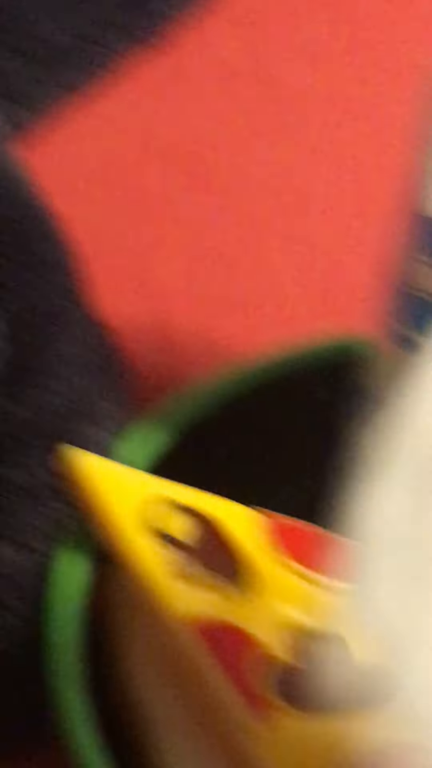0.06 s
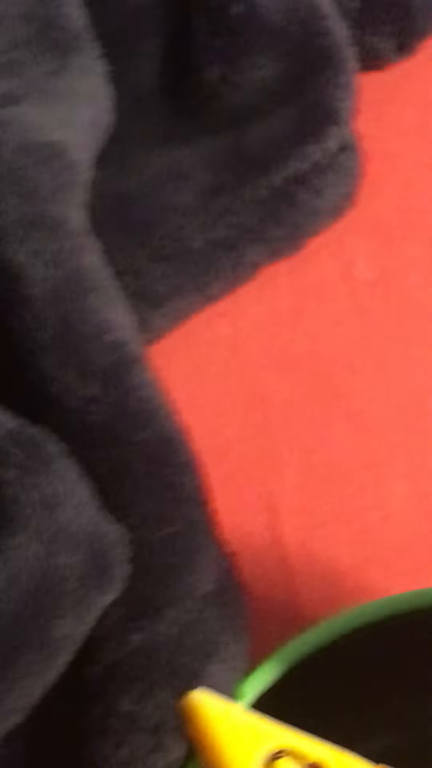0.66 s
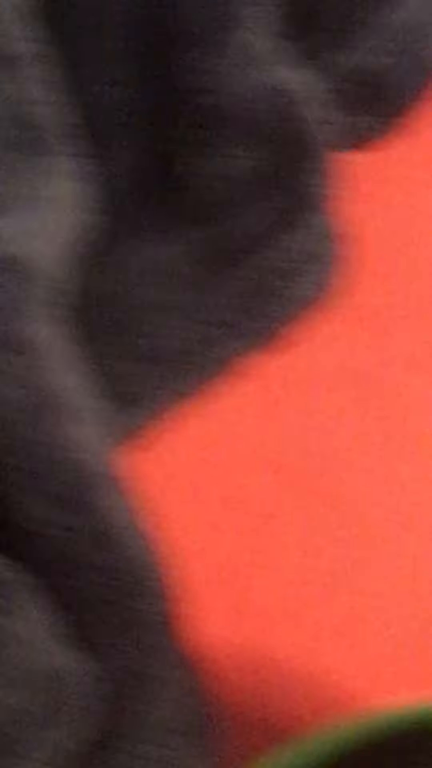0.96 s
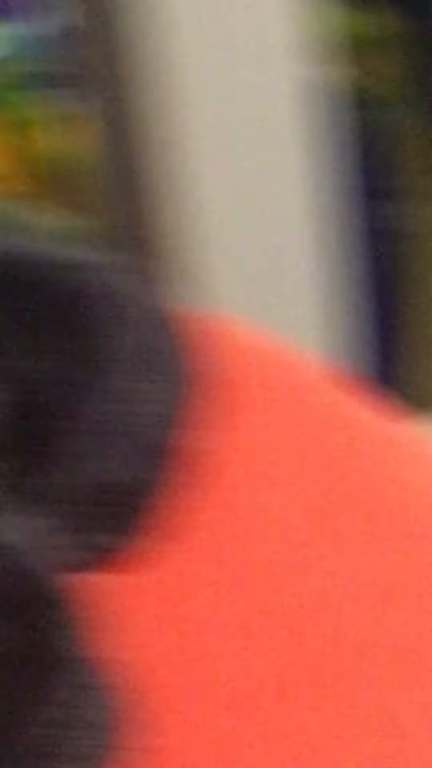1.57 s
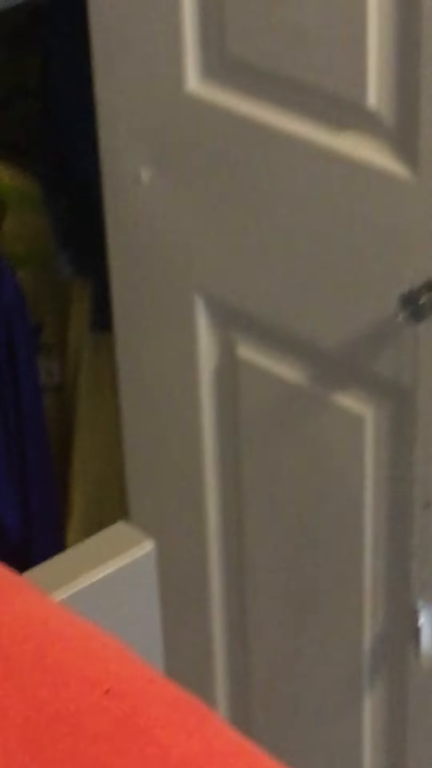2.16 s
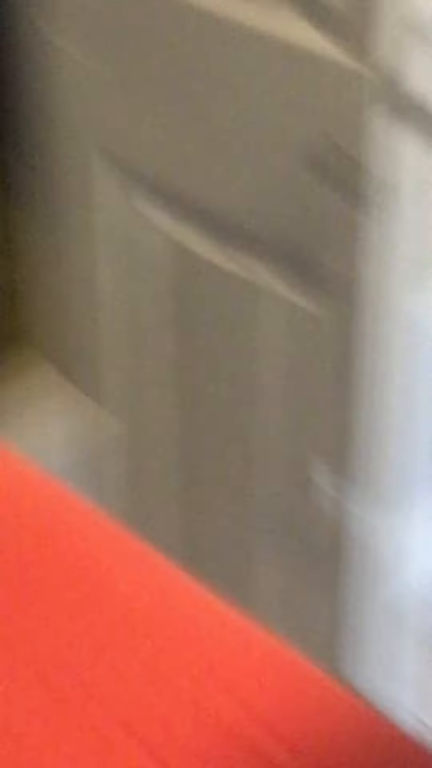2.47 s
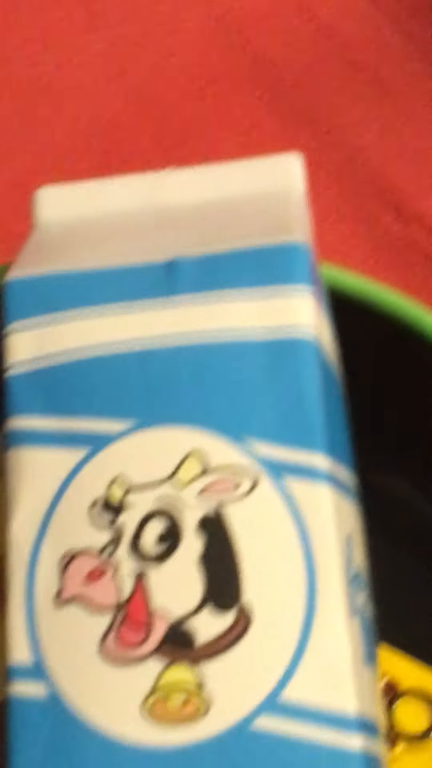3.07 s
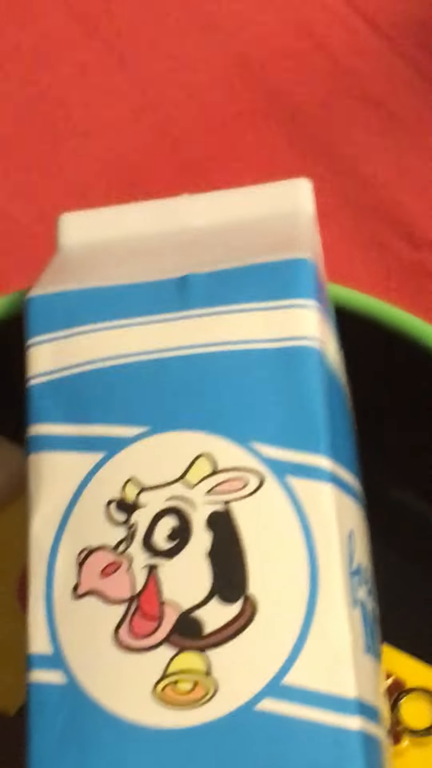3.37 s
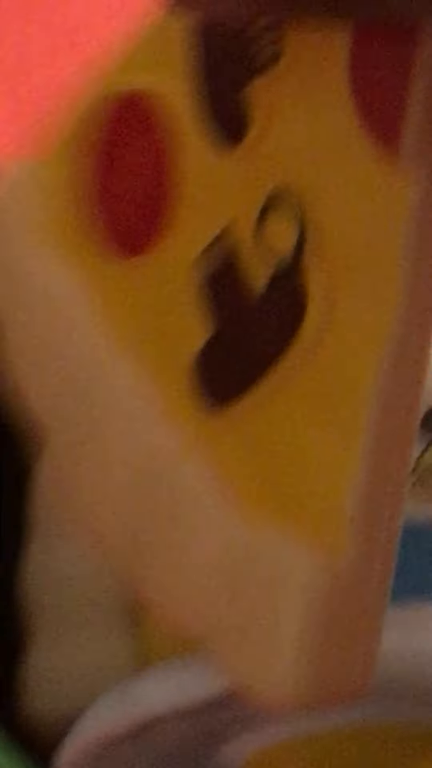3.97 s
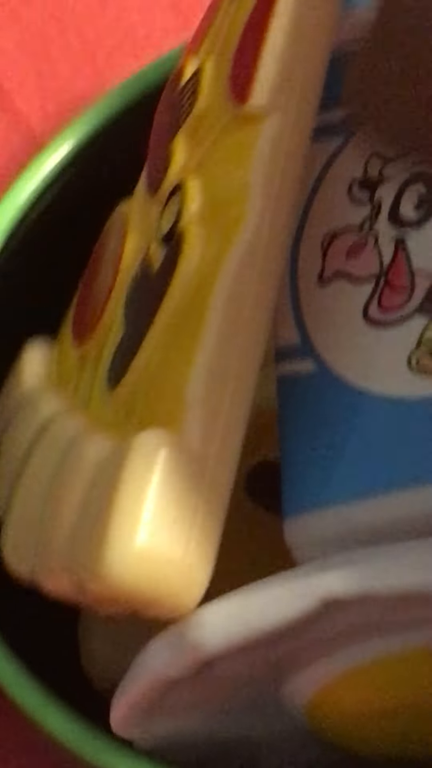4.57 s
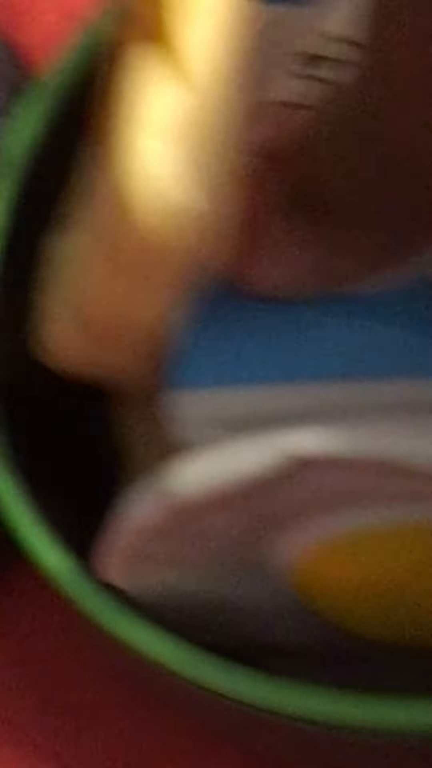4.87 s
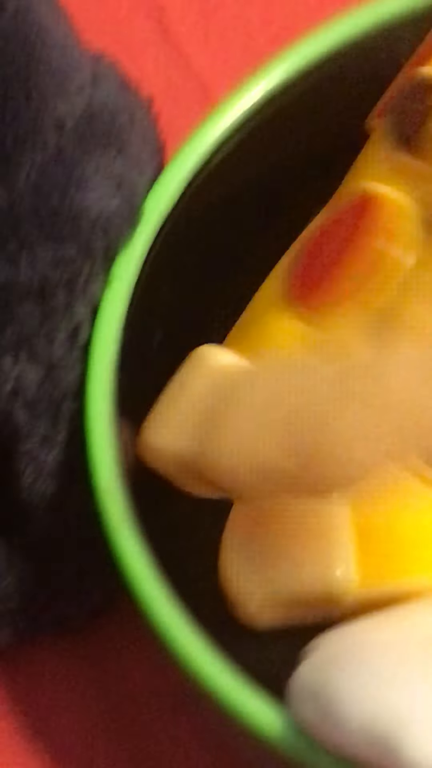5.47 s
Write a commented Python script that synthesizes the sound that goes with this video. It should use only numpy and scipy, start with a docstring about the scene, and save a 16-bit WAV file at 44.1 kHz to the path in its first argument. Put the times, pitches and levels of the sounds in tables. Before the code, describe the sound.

Hollow plastic toy foods knock, rattle and scrape in a plastic bowl, in two close bursts with a pause between.

```python
"""A small bedroom, close up: hollow plastic toy foods are shuffled in a plastic bowl, in two spells.
Each knock rings the pieces and the bowl under a chattering click; some press the bowl into the bedding
with a dull bump. Sliding edges stick and slip, rasping and ringing the same plastic. Soft brushes come
and go, and a few faint ticks dot the pause. Underneath lie a low handling rumble and a thin hiss."""
import sys
import numpy as np
from scipy import signal
from scipy.fft import rfft, irfft, next_fast_len
from scipy.io import wavfile
from scipy.ndimage import uniform_filter1d, map_coordinates

SR = 44100
rng = np.random.default_rng(int(sys.argv[2]) if len(sys.argv) > 2 else 0)


def wav_record(signal):
    """Record a signal, one row per channel, as 16-bit PCM in the file named by sys.argv[1]."""
    frames = np.transpose(np.atleast_2d(signal))
    bounded = np.clip(frames, -1, 1)
    # unit amplitude maps onto the largest positive 16-bit level
    quanta = np.round(bounded * 32767).astype(np.int16)
    wavfile.write(sys.argv[1], SR, quanta)


N = 248528

# Cue levels and ring times are nominal: each layer trims them.
# hiss fader: t/s, level/dB
HISS_FADER = [(0, -64.5), (0.22, -64), (0.3, -71.5)]
# soft rubs: t/s, length/s, level/dB, centre f/Hz
BRUSHES = [(0.839, 0.105, -64.5, 3100), (3.148, .045, -58.5, 5500), (3.155, 0.14, -65, 1600),
           (3.588, 0.033, -65.5, 1805), (4.505, 0.052, -61, 8200), (5.288, .04, -50.5, 5730)]
# hits: t/s, level/dB, bowl send/dB, click send/dB, t60/s, struck piece's note f/Hz
KNOCKS = [(0.9572, -20, -7.5, -11.5, 0.057, 1337), (1.0017, -22.5, -6, -17, 0.21, 1390),
          (1.0209, -27.5, -23, -15.5, 0.057, 1420), (1.1718, -9, -8.5, -10.5, 0.081, 1536),
          (1.188, -14.5, -20.5, -24, .09, 1305), (1.206, -18.5, -15, -14.5, 0.12, 1162),
          (1.4057, -45, -12, -18, 0.11, 963), (1.5578, -46.5, -11, -18, 0.084, 1810),
          (1.6008, -41.5, 9.5, -28.5, 0.059, 1070), (1.6326, -34, 0, -28.5, .041, 1750),
          (1.6506, -16.5, -5, -17.5, .059, 1030), (1.718, -22, 8, -5.5, 0.17, 1825),
          (1.7408, -17, 3, -8, 0.11, 1896), (1.7765, -22, -4, -9.5, .054, 1250),
          (1.7987, -5, -4, -10.5, 0.055, 1440), (1.8499, -21, 1, -20.5, 0.11, 1336),
          (1.8917, -11, 0.5, -12, .08, 1520), (1.966, -15.5, -9, -19.5, 0.044, 1820),
          (1.9772, -8, -11, -16, 0.15, 1802), (2.0083, -9.5, -7, -13.5, 0.11, 1410),
          (2.0178, -11, -8, -10.5, 0.077, 1864), (2.0558, -15.5, -5.5, -20.5, 0.058, 1293),
          (2.0738, -19, -15.5, -10.5, 0.091, 1740), (2.1006, -5.5, -9, -15.5, .065, 1303),
          (2.1314, -14, -4.5, -20, 0.27, 1820), (2.152, -18.5, -19, -12, 0.048, 1630),
          (2.2263, -18.5, -9.5, -13.5, 0.1, 1340), (2.2472, -19.5, -5.5, -20.5, .055, 1840),
          (2.377, -44.5, -4, -17.5, 0.091, 1170), (4.0306, -14, -2.5, -16.5, .05, 1013),
          (4.1765, -46, 15.5, -16, .065, 1240), (4.2248, -20.5, 1, -18.5, .049, 1060),
          (4.233, -15, 2, -16.5, 0.52, 1068), (4.2534, -20, -1, -18, 0.062, 1156),
          (4.3086, -14, -2, -9, .1, 1537), (4.3176, -1.5, -6, -12, 0.053, 1687),
          (4.373, -22, -0.5, -16.5, 0.046, 1130), (4.579, -30, 1, -26, 0.033, 1193),
          (4.6943, -33.5, 2.5, -22, .05, 1230), (4.7079, -35, -18, -10, .035, 1120),
          (4.806, -21, 8.5, -15.5, 0.063, 1310), (4.8424, -8.5, -8, -15, 0.045, 1406),
          (4.8791, -18, -13, -22, .06, 1300), (4.9936, -11, -7, -12.5, 0.083, 1374),
          (5.0568, -21.5, -1.5, -21.5, 0.075, 1198), (5.0922, -29.5, 3.5, -31, 0.046, 1100),
          (5.2117, -14.5, -7, -14.5, 0.096, 1162), (5.2309, -14.5, -3.5, -26, 0.082, 1135),
          (5.4361, -28.5, -2, -37, 0.078, 1076), (5.5291, -26, 1, -19.5, 0.39, 1110),
          (5.5639, -5.5, -9, -11.5, 0.11, 1160), (5.5773, -5.5, -5, -13, 0.1, 1213),
          (5.6069, -7.5, 1, -15, .065, 1873), (5.6236, -3, -20, -8.5, 0.074, 1730)]
# drags: start t/s, end t/s, bowl level/dB, pieces level/dB, grit level/dB
SLIDES = [(1.046, 1.236, -43.5, -66, -61), (1.771, 1.869, -40, -36.5, -57.5),
          (1.874, 2.122, -34.5, -36, -55), (2.15, 2.237, -41.5, -43.5, -56),
          (4.197, 4.329, -40, -50.5, -57.5), (4.581, 4.79, -51.5, -58.5, -69),
          (4.796, 4.896, -37.5, -42.5, -59), (5, 5.3, -39.5, -47, -63), (5.46, 5.575, -52.5, -52.5, -76)]
# the bowl pushed into the bedding: t/s, level/dB
BUMPS = [(1.794, -43.5), (2.111, -49.5), (4.026, -36), (4.317, -36.5), (4.844, -41), (4.995, -38.5),
         (5.565, -31.5)]
# light ticks: t/s, level/dB, f/Hz, t60/s
TICKS = [(3.049, -44.5, 12640, 0.021), (3.0648, -38.5, 9530, 0.017), (3.158, -46, 5720, 0.02),
         (3.1646, -37, 12100, 0.013), (3.485, -41.5, 9700, 0.0202), (3.5842, -50, 7900, 0.018),
         (3.6, -41, 5700, 0.0198)]
# modes of the bowl: f/Hz, level/dB, t60/s
BOWL_MODES = [(470, -26.5, 0.22), (513, -12, 0.055), (624, -13.5, 0.17), (802, -8, 0.12),
              (899.7, 3.5, 0.074), (955.3, 0, 0.16), (1019, 2.5, 0.038), (1164, -6.5, 0.081)]
# modes of the hollow pieces: f/Hz, level/dB, t60 as a multiple of the contact's t60
SHELL_MODES = [(1120, -4.5, 0.3), (1225, 3, 1.9), (1290, -7, 3.6), (1415, -4, 2.4), (1520, -6.5, 3.3),
               (1726, -1.5, 2.1), (1825, -8, 3.3), (2150, -17, 0.42), (2297, 1, 1.6), (2530, 1, 1.2),
               (2722, -2, 0.48), (2980, 1, 1.3), (3120, -10.5, 2.4), (3460, -12.5, 2.2), (3737, -2, 1.2),
               (4013, 1, 0.56), (4376, -8.5, 1.7)]
# EQ curves: f/Hz, level/dB
RUMBLE_EQ = [(15, -35), (28, -13.5), (42, -3.5), (70, 1), (115, -12.5), (170, -11), (230, -21),
             (400, -30.5), (700, -70)]  # low handling rumble
HISS_EQ = [(150, -36), (250, -8), (493, -16.5), (607, -9.5), (710, -15), (1280, -11.5), (1380, -14),
           (2320, -15), (4900, -20.5), (16000, -20.5)]  # thin hiss
CLACK_EQ = [(400, -35), (900, -3), (1250, 8), (1800, 2.5), (2300, 0), (3800, -4), (5500, -26),
            (9000, -45.5)]  # midrange of a knock
THUD_EQ = [(30, -30), (100, -14.5), (250, 0), (500, 2.5), (720, 8), (1000, -11), (2000, -24)]  # its low body
CLICK_EQ = [(300, -59.5), (1500, -36.5), (3300, 0), (4500, 0), (6000, 3.5), (7800, -7.5), (10500, -14),
            (15500, -37)]  # its hard edge
SNAP_EQ = [(300, -59), (4000, -27), (7500, -4), (9800, 3.5), (12000, -2), (15500, -3)]  # the top of the click
RUB_EQ = [(60, -20.5), (200, -8.5), (550, -7), (800, -8.5), (1000, -10), (1400, -0.5), (2500, -10),
          (6000, -47.5)]  # dull rub on the bowl
RASP_EQ = [(400, -21.5), (1200, -1), (1800, 1), (2600, 3.5), (4000, -8.5), (6500, -25.5), (12000, -52.5)]  # dry rasp of piece on piece
GRIT_EQ = [(200, -49), (1200, -21), (2500, -5), (4000, 7.5), (6000, 3.5), (8000, 0), (10000, -1.5),
           (15500, -7)]  # hiss of a sliding edge
BUMP_EQ = [(40, -29), (110, -10), (170, -3), (255, -4), (310, -5), (400, -24.5), (700, -43), (2000, -81)]  # bowl into bedding
# the bedroom's decay: f/Hz, t60/s
ROOM_DECAY = [(200, 0.73), (600, 0.1), (1500, 0.22), (4000, 0.18), (10000, 0.071), (16000, 0.016)]

TOP_HZ = 16000  # band limit


def amp(db):
    """Decibels to gain."""
    return 10 ** (np.asarray(db) / 20)


def unit(x):
    """Scale to rms 1."""
    return x / np.sqrt(np.mean(x ** 2) + 1e-20)


def blow(x):
    """Scale a transient to the energy of 10 ms at rms 1."""
    return x / np.sqrt(np.sum(x ** 2) / (SR / 100) + 1e-20)


def along(points, hz):
    """Read (Hz, value) points on a log axis."""
    f, values = np.transpose(points)
    return np.interp(np.log(hz + 1), np.log(f + 1), values)


def colour(x, eq):
    """Minimum-phase EQ, so nothing rings ahead of an attack."""
    size = 4096
    cepstrum = irfft(np.log(amp(along(eq, np.fft.rfftfreq(size, 1 / SR)))))
    cepstrum[1:size // 2] *= 2
    cepstrum[size // 2 + 1:] = 0
    return signal.fftconvolve(x, irfft(np.exp(rfft(cepstrum))))[:len(x)]


def band(x, hz, q):
    """One resonance at hz."""
    return signal.lfilter(*signal.iirpeak(hz, q, SR), x)


def fade(t, t60):
    """Exponential decay, 60 dB down at t60."""
    return np.exp(-np.log(1000) * t / np.maximum(t60, 1e-4))


def sway(per_s):
    """A smooth random curve through per_s points a second."""
    return map_coordinates(rng.standard_normal(600), [np.arange(N) * per_s / SR], mode="wrap")


def add(track, s, x):
    """Mix x into the track at time s."""
    part = track[max(round(s * SR), 0):][:len(x)]
    part += x[:len(part)]


def rumble(toys):
    """A swaying low bed that grows while the toys are handled."""
    handling = np.sqrt(np.abs(uniform_filter1d(toys ** 2, round(0.23 * SR))))  # running rms
    at_rest = amp(-62 + 3 * sway(per_s=10))
    level = np.hypot(at_rest, amp(-30.5) * handling)
    return level * unit(colour(rng.standard_normal(N), RUMBLE_EQ))


def hiss():
    """Thin air that drops back just after the start."""
    level_db = np.interp(np.arange(N) / SR, *np.transpose(HISS_FADER))
    return amp(level_db) * unit(colour(rng.standard_normal(N), HISS_EQ))


def slips(per_s, spiky, clump_db):
    """Stick-slip impulses of uneven size, clumping as the grip varies; rms 1."""
    size, sign = rng.standard_normal((2, N))
    knots = np.arange(N) * 90 / SR  # 90 new grips a second
    grip = map_coordinates(rng.standard_normal(int(knots[-1]) + 2), [knots], order=1)
    slipping = rng.random(N) < per_s / SR
    strength = np.exp(spiky * np.minimum(size, 2)) * amp(clump_db * grip)
    return unit(slipping * np.sign(sign) * strength)


def brushes():
    """Brief soft rubs: fine slips that swell and fade."""
    out = np.zeros(N)
    for s, length, db, hz in BRUSHES:
        rub = unit(band(slips(per_s=1300, spiky=0.18, clump_db=0.5), hz, q=1.1))
        size = round(length * SR)
        add(out, s, amp(db) * np.hanning(size) * rub[:size])
    return out


def contacts():
    """Every knock with its note's level, plus one weaker rebound for each hard knock."""
    settle_s, hard_db, rebound_db = 0.14, -14.5, -6.5
    rests = np.diff([row[0] for row in KNOCKS], prepend=0)
    notes_db = -18 + 6 * np.minimum(rests / settle_s, 1)  # jostled pieces damp each other
    hits = [(*row, note_db) for row, note_db in zip(KNOCKS, notes_db)]
    flights_s = 0.0075 * np.exp(0.15 * rng.standard_normal(len(hits)))
    rebounds = [(s + flight, db + rebound_db, *same)
                for (s, db, *same), flight in zip(hits, flights_s) if db > hard_db]
    return hits + rebounds


def ring(modes, t, stretch, detune, scatter_db):
    """Damped modes; each point of contact excites them with new strengths and signs."""
    hz, db, t60 = np.transpose(modes)[:, :, None]
    pitch, level, side = rng.standard_normal((3, len(modes), 1))
    waves = np.sin(2 * np.pi * hz * (1 + detune * pitch) * t) * fade(t, t60 * stretch)
    return np.sum(np.sign(side) * amp(db + scatter_db * level) * waves, axis=0)


def chatter(t, t60, spiky, first_db):
    """One sharp contact, then a dying spray of tiny rebounds."""
    size, sign = rng.standard_normal((2, len(t)))
    spray = blow(sign * np.exp(spiky * size) * fade(t, t60))
    return spray + amp(first_db) * blow(t == 0)


def rippled(eq, depth_db):
    """Every edge has its own crowd of damped high modes: random peaks and dips on an EQ curve."""
    hz = np.linspace(eq[0][0], TOP_HZ, 70)
    return np.transpose([hz, along(eq, hz) + depth_db * rng.standard_normal(len(hz))])


def knocks():
    """Each contact thuds, rings the struck piece, its neighbours and the bowl, and clicks at the edge."""
    out, t = np.zeros(N), np.arange(SR // 8) / SR
    attack = 1 - fade(t, 0.005)
    for s, db, bowl_db, click_db, t60, note_hz, note_db in contacts():
        note = blow(attack * np.sin(2 * np.pi * note_hz * t) * fade(t, t60 * 1.3))
        shell = blow(attack * ring(SHELL_MODES, t, stretch=t60, detune=0.0098, scatter_db=1))
        clack = blow(colour(chatter(t, t60, spiky=0.51, first_db=-31), CLACK_EQ))
        bowl = blow(attack * ring(BOWL_MODES, t, stretch=0.93, detune=0.0066, scatter_db=-0.5))
        thud = blow(colour(chatter(t, t60 * 0.94, spiky=0.23, first_db=-11.5), THUD_EQ))
        click_spray = chatter(t, t60 * 0.87, spiky=1, first_db=-25.5)
        click = blow(colour(click_spray, rippled(CLICK_EQ, depth_db=6.5)))
        snap_spray = chatter(t, t60 * 0.46, spiky=0.35, first_db=-13.5)  # the top dies first
        snap = blow(colour(snap_spray, rippled(SNAP_EQ, depth_db=3.5)))
        thud_db = -21 - 0.26 * (db + 20)  # light knocks are duller
        tone = amp(note_db) * note + amp(-16.5) * shell + amp(bowl_db - 9.5) * bowl
        body = amp(-13.5) * clack + amp(thud_db) * thud
        edge = amp(click_db - 7) * (click + amp(-2) * snap)
        add(out, s, amp(db) * (tone + body + edge))
    return out


def wandering_ring(force, modes, stretch, detune):
    """As the point of contact travels, the slips feed an ever new mix of the modes."""
    out, t = np.zeros(N), np.arange(SR // 16) / SR
    hop = SR // 20
    crossfade = np.sqrt(np.hanning(2 * hop))
    for start in range(0, N, hop):
        part = force[start:start + 2 * hop]
        if np.abs(part).max() > 1e-7:
            ringing = ring(modes, t, stretch, detune, scatter_db=4)
            ringing /= np.linalg.norm(ringing)
            add(out, start / SR, signal.fftconvolve(part * crossfade[:len(part)], ringing))
    return out


def slides():
    """Edges dragging over smooth plastic feed small slips into the bowl and the hollow pieces."""
    t, levels = np.arange(N) / SR, np.zeros((3, N))
    attack_db_per_s, release_db_per_s = 335.5, 258
    for start, end, *dbs in SLIDES:
        before, after = np.maximum(start - t, 0), np.maximum(t - end, 0)
        stroke = amp(-attack_db_per_s * before - release_db_per_s * after)
        levels = np.maximum(levels, amp(dbs)[:, None] * stroke)
    pressure = amp(1.47 * sway(per_s=60))
    on_bowl, on_shell, on_edge = levels * pressure
    grains = slips(per_s=4000, spiky=0.5, clump_db=3)
    low_modes = SHELL_MODES[:9]  # pieces pressed together ring only low; the high modes just rasp
    bowl = amp(-0.5) * wandering_ring(on_bowl * grains, BOWL_MODES, stretch=0.66, detune=0.022)
    rub = amp(-4) * on_bowl * unit(colour(grains, RUB_EQ))
    shell = amp(-2) * wandering_ring(on_shell * grains, low_modes, stretch=0.038, detune=0.015)
    rasp = amp(-10) * on_shell * unit(colour(grains, RASP_EQ))
    grit = amp(7.5) * on_edge * unit(colour(grains, GRIT_EQ))
    return bowl + rub + shell + rasp + grit


def bumps():
    """The harder blows press the bowl into the bedding with a dull bump."""
    out, t = np.zeros(N), np.arange(SR // 7) / SR
    for s, db in BUMPS:
        spray = chatter(t, t60=0.1, spiky=0.3, first_db=-1)
        add(out, s, amp(db) * blow(colour(spray, BUMP_EQ)))
    return out


def ticks():
    """Tiny bright ticks with no body behind them."""
    out, t = np.zeros(N), np.arange(SR // 20) / SR
    for s, db, hz, t60 in TICKS:
        spray = chatter(t, t60, spiky=0.66, first_db=-19.5)
        add(out, s, amp(db - 15) * blow(band(spray, hz, q=14)))
    return out


def room(x):
    """The bedroom's short diffuse tail, duller as it dies."""
    hz, t, noise = signal.stft(rng.standard_normal(SR // 2), SR, nperseg=256)
    tail = signal.istft(noise * fade(t, along(ROOM_DECAY, hz)[:, None]), SR, nperseg=256)[1]
    tail = colour(tail, eq=[(150, -2), (1200, -0.5), (4000, 0), (14000, 16)])
    tail *= 1 - np.exp(-(np.arange(len(tail)) / SR / 0.016) ** 2)  # the walls answer a little late
    return signal.fftconvolve(x, tail / np.linalg.norm(tail))[:N]


def scene():
    """The toys up front with a touch of room, over rumble and hiss; mono."""
    toys = knocks() + bumps() + slides() + ticks() + brushes()
    return (toys + amp(-20.5) * room(toys) + rumble(toys) + hiss())[None]


def record(dry):
    """The small microphone rounds off the tallest peaks and drops the deepest bass and the very top."""
    ceiling, low_cut_hz = 0.8, 36.6
    rounded = dry / (1 + (dry / ceiling) ** 4) ** (1 / 4)
    size = next_fast_len(N + SR // 2)
    hz = np.fft.rfftfreq(size, 1 / SR)
    bass_cut = hz ** 4 / np.hypot(hz ** 4, low_cut_hz ** 4)
    top_cut = 1 / np.hypot(1, (hz / TOP_HZ) ** 120)
    return irfft(rfft(rounded, size) * bass_cut * top_cut, size)[:, :N]


dry = scene()
out = record(dry)
wav_record(out)
```